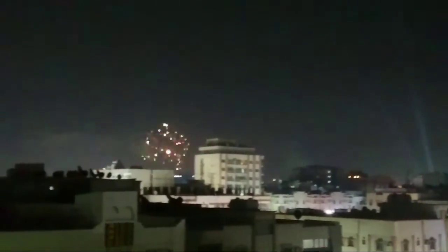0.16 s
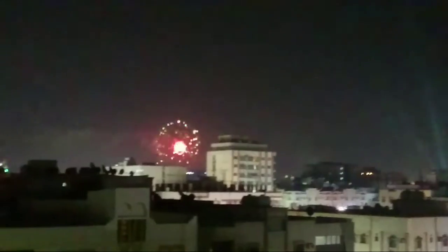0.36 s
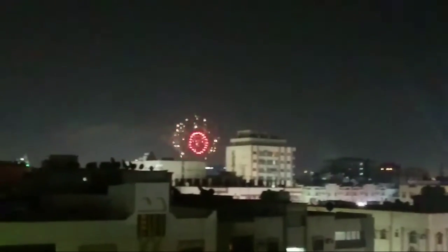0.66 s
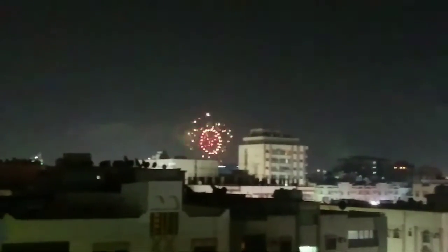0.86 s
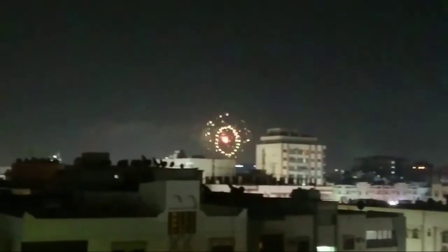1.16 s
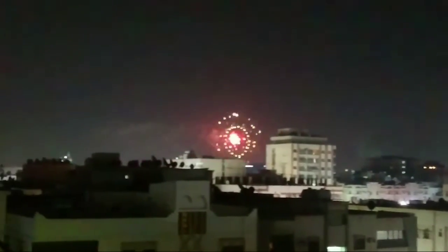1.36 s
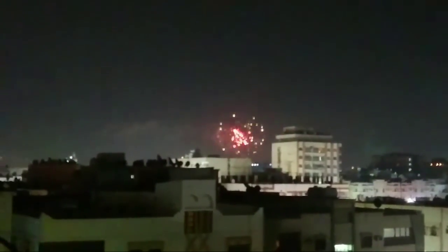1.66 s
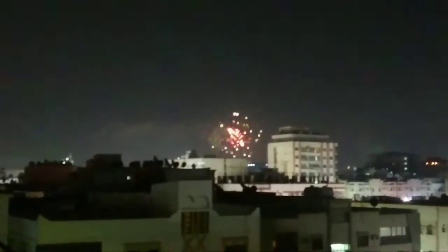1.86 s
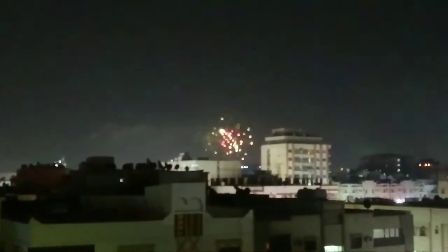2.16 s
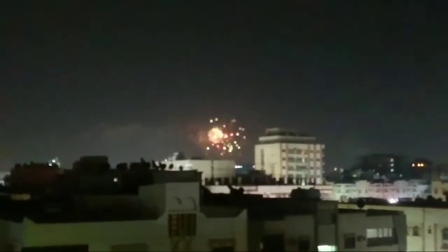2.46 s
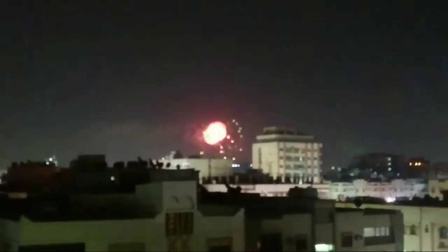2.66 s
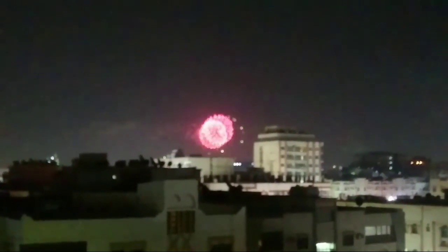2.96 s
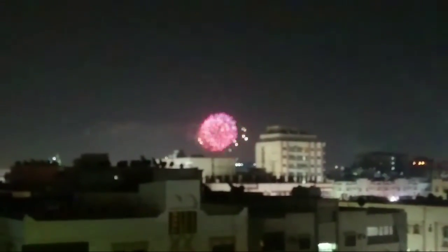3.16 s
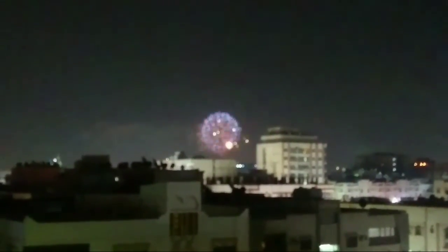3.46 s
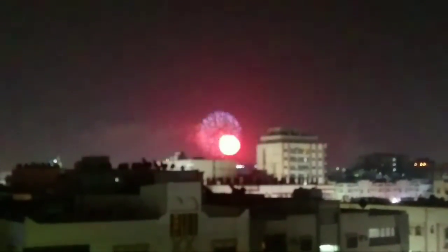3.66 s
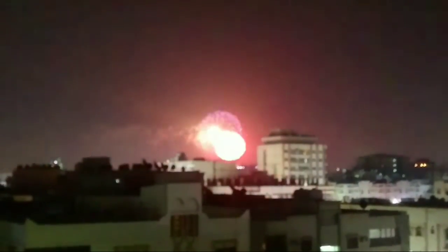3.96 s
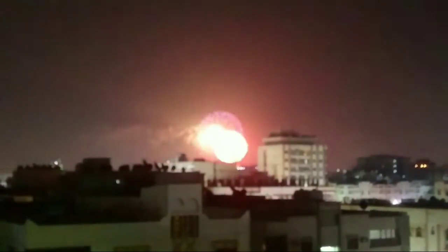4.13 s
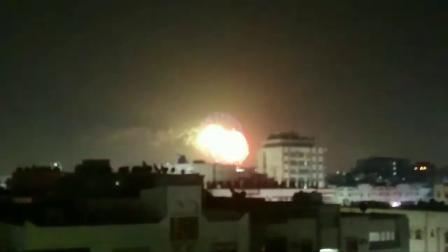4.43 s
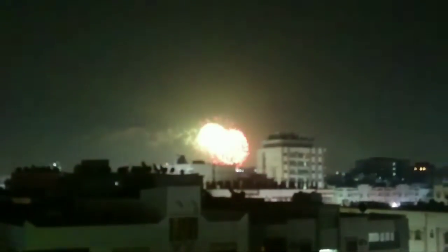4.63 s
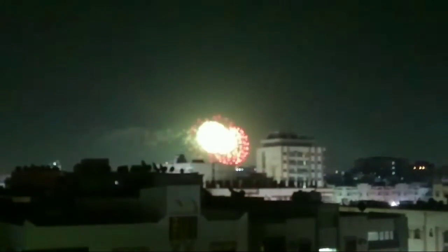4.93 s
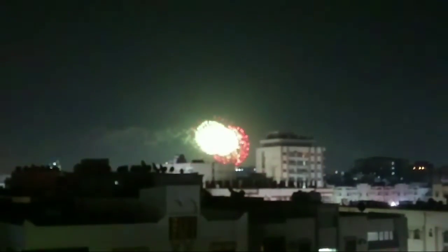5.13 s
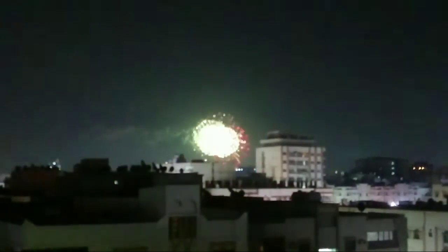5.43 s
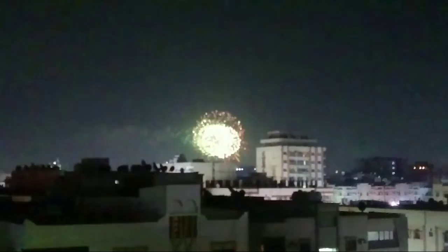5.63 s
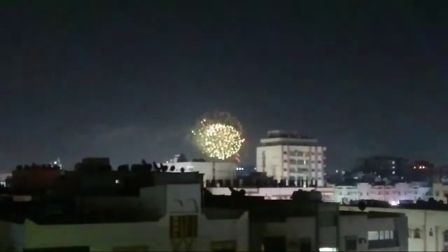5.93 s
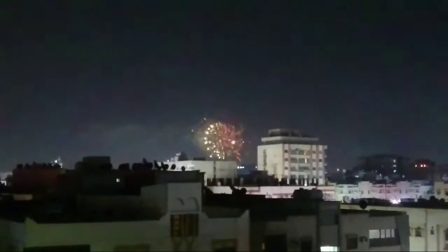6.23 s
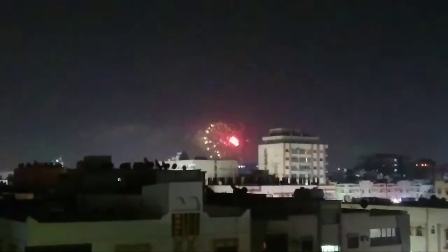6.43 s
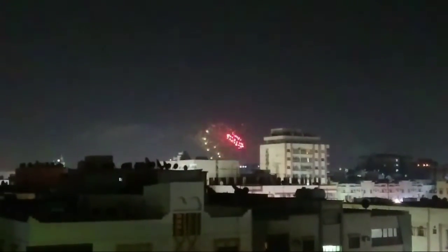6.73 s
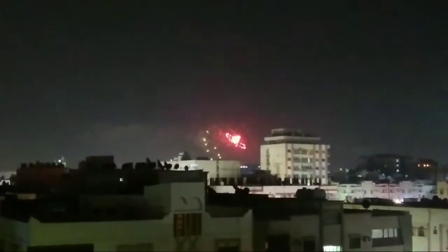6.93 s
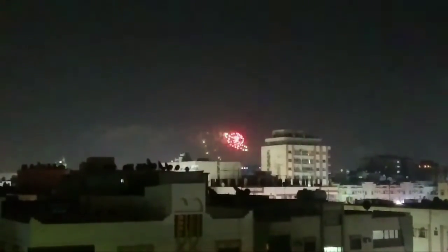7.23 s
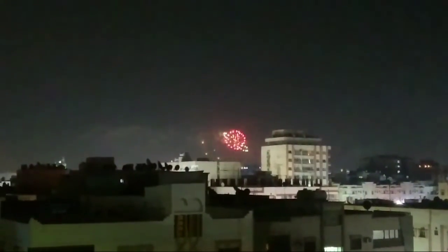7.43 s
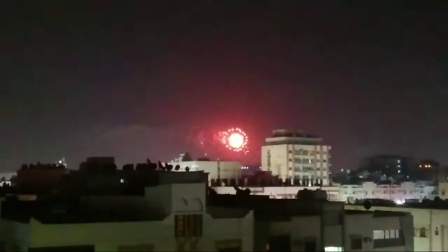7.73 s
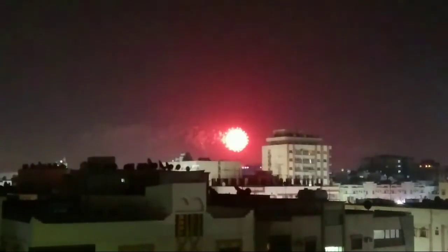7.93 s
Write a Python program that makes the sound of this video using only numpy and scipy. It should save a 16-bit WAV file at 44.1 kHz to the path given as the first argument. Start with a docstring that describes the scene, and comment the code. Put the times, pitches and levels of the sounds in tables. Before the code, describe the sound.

Distant aerial fireworks heard from a walled roof terrace at night. A rapid, uneven cluster of muffled cracks and deep booms fills the first two seconds, then the rumble fades. Two strong blasts follow near four seconds, then well-spaced single ones. Each claps back off house fronts and rolls over the town, above a quiet low wash of distant traffic.

```python
"""A walled roof terrace over a town at night, two microphones, distant fireworks.
First, and throughout, the steady wash of the town: shaped noise with a faint hum. Then each blast wave
arrives as a short crack of pressure jumps and filtered noise, and sets the air between the walls booming.
Nearby roofs crackle and a roll of countless weak echoes, made of decaying noise, spreads over the town.
Through the roll come the claps of house fronts, near then far: resonant knocks smeared by noise."""
import sys
import numpy as np
from scipy import signal
from scipy.io import wavfile
from scipy.ndimage import uniform_filter1d

SR = 44100
rng = np.random.default_rng(int(sys.argv[2]) if len(sys.argv) > 2 else 0)


def to_wav(s):
    """Save 16-bit WAV."""
    ch = np.atleast_2d(s).T  # columns
    pcm = np.round(np.clip(ch, -1, 1) * 32767)  # PCM
    wavfile.write(sys.argv[1], SR, pcm.astype(np.int16))


N = 356769

# Wash of the town: [f/Hz, level/(dB per Hz)]
WASH_SPECTRUM = [(30, -106.5), (55, -71), (100, -71.5), (200, -77), (400, -78.5), (750, -85), (1050, -85),
                 (1200, -89.5), (2200, -95.5), (4000, -101), (6400, -103), (7600, -111), (11000, -117),
                 (14000, -123)]
# How alike the wash is at both microphones: [f/Hz, likeness from 0 to 1]
WASH_LIKENESS = [(100, 0.91), (500, 1), (1500, 0.22), (3000, 0.01), (6000, 0.023)]
# Wash at the left microphone over the right: [f/Hz, level/dB]
WASH_LEFT = [(60, -8), (200, -3.5), (400, -2.5), (2500, -3), (12000, -2.5)]
# Wavering of the wash: [f/Hz, standard deviation/dB]
WASH_SWELL = [(60, 2.2), (300, 1.3), (1000, 0.4), (4000, 0.2)]
# Faint wavering hum from the town: [f/Hz, width/Hz, level/dB]
TOWN_HUM = (232, 4, -55.5)

# Shells: [t/s, blast level/dB, rise/ms, boom/dB over the blast, upper boom/dB over the boom,
#  brightness/dB, snap/dB over the blast, second crack/dB over the blast, near clap level/dB,
#  far clap level/dB, far clap edge/dB, last knock/dB, extra way to the far fronts/ms]
SHELLS = [(0.409, -16, 1, -2, 4.5, 0, -62, -16, -47, -62, 1, 1, -2),
          (0.4171, -10, 0.35, 1.5, -2, -0.5, -47, -7, -30.5, -20, -2, 1, 4),
          (.6500, -12.5, 0.18, 9, -7, 11, -46, -5, -30.5, -42, 8, 3, 4.5),
          (0.7200, -9.5, 0.41, 6.5, -7, 1, -65, -0.5, -32, -22, -6, 1, 2.5),
          (0.7786, -34, 0.26, -8.5, 1, 7, -45, -15, -73, -62, 0, -2, 0),
          (0.7864, -16, 0.19, 4.5, 6, 7.5, -38, -3, -40, -27, 2, 1, 3.5),
          (1.0588, -13, 0.36, 8, -6.5, 3.5, -45, 1, -21.5, -29, -12, -5, 1.3),
          (1.16, -7.5, 0.26, -0.5, 6, 9, -52, -14, -32, -21.5, -5.5, 5.5, -2),
          (1.7274, -27, 0.28, 5.5, 7, 7, -52, 7, -48, -29, -2, -9, 3),
          (1.7560, -17.5, 0.22, 2, 5, -6, -45, -6, -49, -39, -2, 3, 0.5),
          (1.814, -12, 0.38, -2, 4.5, -30, -53, -25, -53, -32, -7, -6, 7),
          (1.846, -32.5, 0.35, 8, 8, -17, -60, -15, -59, -48, 0, 2, 16),
          (2.0850, -19, 0.37, 6, 0, 4.5, -48, -8, -42, -27.5, -8, 2, 5.5),
          (3.6785, -7.5, 0.23, 3.5, -2, 11, -38, -2, -28, -18.5, 0, 8, 1.7),
          (3.868, -28.5, 0.22, -13, 0, -4, -43, -11, -60, -50, 0, 2, -1),
          (4.025, -6.5, 0.41, -1, 3, -1.5, -41, -2.5, -28, -31, 5, 7, -2),
          (5.1158, -8.5, 0.23, 2.5, 1, 3.5, -49, -8, -33.5, -20, -5, 0.5, 0.44),
          (6.256, -54, 0.6, -2, 6.5, -10, -70, -16, -80, -77, 3, 0, 0),
          (6.345, -36, 0.93, -8.5, 11, -10, -70, -15, -80, -74, 0, 0, 3),
          (7.2572, -5.5, 0.28, -2, 2, 0, -37, -6, -35.5, -23.5, -7, 0, 0.5),
          (7.9830, -5.5, 0.24, -2, 2, 3, -42, -3, -41, -22, -2, 0, 4)]
# Pressure waves, direct and off near walls: [delay/ms, level/dB over the blast, pressure phase/ms, push + or pull -]
NEAR_WAVES = [(0.332, 13.5, 0.47, "+"), (0.97, 12, 0.28, "+"), (5.333, 6, 0.41, "+"),
              (32.16, -0.5, 2.5, "+"), (41.3, -8, 2, "-"), (49.24, 0, 1.73, "+"), (54.85, -4, 1, "-")]
POLARITY = {"+": 1, "-": -1}  # [push or pull: factor]
# Thin snap on the wave front: [f/Hz, width/Hz]
SNAP_BAND = (6000, 3500)
# Rattle of the splintered front: [f/Hz, width/Hz, level/dB, t60/s]
FRONT_RATTLE = [(430, 700, -10.5, 0.027), (940, 500, -9, 0.043), (2290, 1700, -23, 0.011)]
# Rattle off the nearest wall: [f/Hz, width/Hz, level/dB, t60/s]
WALL_RATTLE = [(500, 1100, -10.5, 0.019), (1102, 990, -16.5, 0.019), (2740, 1800, -30, 0.0062)]
# Corners of the terrace that ring briefly: [f/Hz, width/Hz, level/dB]
CORNERS = [(568, 65, -26), (918, 200, -19.5)]
# Standing waves of the terrace air: [f/Hz, level/dB, t60/s, push + or pull - at the microphone]
STANDING_WAVES = [(59.9, -4, 0.77, "+"), (65, 2, 0.16, "+"), (72.4, -16, 1.2, "+"),
                  (75.77, -0.5, 0.78, "-"), (81.9, -6, 0.29, "-"), (90.7, -12, 1.13, "+"),
                  (98.3, -13.5, 0.45, "-"), (112.6, 1.1, 0.17, "-"), (143, -32.5, 0.44, "+"),
                  (151, -24, 0.91, "-"), (189.4, -4, 0.064, "-"), (234, -19, 0.33, "-"),
                  (322, -23.5, 0.46, "-"), (392.8, -18.5, 0.11, "+")]
# Crackle off nearby roofs: [f/Hz, width/Hz, level/dB, t60/s, grains per s, spread/dB]
ROOF_CRACKLE = (995, 1202, -38, 0.15, 904, 5.5)
# Roll over the roofs: [f/Hz, relative level/dB, t60/s]
ROLL_BANDS = [(37.6, -40, 2.8), (60, -14, 4.4), (110, -15.5, 2.55), (150, -17, 2.37), (208, -21.5, 2.37),
              (481, -30, 3.37), (870, -42.5, 2.27), (2295, -59, 0.86)]
# Time the roll takes to gather: [f/Hz, rise/s]
ROLL_RISE = [(60, 0.2), (200, 0.015), (600, 0.009)]
# Open ground, then the far blocks answer in the roll: [t/s, level/dB]
OPEN_GROUND = [(0, 4), (0.12, -0.5), (0.2, -7), (0.243, -3), (0.262, -2), (0.34, 4), (0.45, -1)]
# House fronts, the first near: [delay/s, knock level/dB, knock f/Hz, knock width/Hz,
#  edge level/dB, edge f/Hz, smear t60/s, left microphone leads by/ms]
HOUSE_FRONTS = [(.0755, -0.5, 704, 1095, -5, 1450, 0.042, .1),
                (0.2533, 0.5, 531, 606, -14, 1500, 0.049, 0.33),
                (.3205, 0.5, 467, 500, -15.5, 1600, .035, .3),
                (0.3565, -7.5, 540, 600, -10.5, 1600, 0.046, 0.39)]

BOUNCE_MS = 5.6  # the nearest wall repeats each crack
DULL_DB, DULL_PER_BRIGHT = -1.5, -0.16  # the brighter a shell, the less dull rattle
UPPER_HZ = 95  # higher standing waves depend on where the shell bursts
ROLL_DB, ROLL_PER_BOOM = -4, 0.7  # the roll grows more slowly than the boom
LUMP_DB = 3.5  # the roll comes in surges
LEDGES = 0.072  # smear of a house front, relative to its knock
EDGE_WIDTH_HZ, EDGE_SPREAD_S, SPLINTERS = 2300, 0.0022, 0.45  # the edge arrives as a few splinters
AIR_HZ = 3130  # the air has taken the treble above
BAND_LIMIT_HZ = 14900


def gain_of(db):
    """Amplitude factor of a level in dB."""
    return 10 ** (np.asarray(db) / 20)


def read(points, hz):
    """Read a curve between its points, on a logarithmic frequency scale."""
    f, value = np.transpose(points)
    return np.interp(np.log(hz + 1), np.log(f + 1), value)


def add(mix, s, sound):
    """Lay a sound into the mix at s seconds, cut at the end."""
    part = mix[..., round(s * SR):][..., :sound.shape[-1]]
    part += sound[..., :part.shape[-1]]


def pair(x, left_db, lead_ms=0.):
    """Two microphones: the left one weaker, the right one later."""
    lag = max(round(lead_ms * SR / 1000), 0)
    later = np.r_[np.zeros(lag), x[:len(x) - lag]]
    return np.array([x, later]) * gain_of([[left_db / 2], [-left_db / 2]])


def resonate(x, hz, width):
    """A fixed resonance of gain 1: shift the band to 0 Hz, smooth, shift back."""
    turn = np.exp(2j * np.pi * hz * np.arange(x.shape[-1]) / SR)
    r = np.exp(-np.pi * width / SR)
    return 2 * (turn * signal.lfilter([1 - r], [1, -r], x / turn)).real


def twice(x, hz, width):
    """A resonance passed twice: steeper flanks."""
    return resonate(resonate(x, hz, width), hz, width)


def steep(x, hz, width):
    """A resonance passed twice, scaled to peak 1."""
    y = twice(x, hz, width)
    return y / abs(y).max()


def town():
    """Traffic and machines far below: random spectra with drifting patches, left microphone first."""
    frames, hz = N // 512 + 5, np.fft.rfftfreq(2048, 1 / SR)
    a, b, c, d, patches = rng.standard_normal((frames, 1025, 5)).T
    patches = uniform_filter1d(uniform_filter1d(patches, 16, 0), 8, 1)
    swell = uniform_filter1d(uniform_filter1d(rng.standard_normal(frames), size=5), size=5)
    same = np.clip(read(WASH_LIKENESS, hz), 0, 1)[:, None]
    sooner = np.exp(2j * np.pi * hz * 0.00035)[:, None]  # 0.35 ms
    right = a + 1j * b
    left = same * sooner * right + np.sqrt(1 - same ** 2) * (c + 1j * d)
    level_db = read(WASH_SPECTRUM, hz)[:, None] + 0.33 * patches / patches.std()
    level_db = level_db + np.outer(read(WASH_SWELL, hz), swell / swell.std())
    z = np.array([left, right]) * gain_of(level_db)
    z *= gain_of(np.outer([.5, -.5], read(WASH_LEFT, hz)))[:, :, None]
    wash = np.sqrt(SR / 2048 * 3) * signal.istft(z, nperseg=2048, noverlap=1536)[1][:, :N]
    return wash + town_hum()


def town_hum():
    """A steady tone plus narrow noise around it, which makes it waver."""
    hz, width, db = TOWN_HUM
    noise = twice(rng.standard_normal(N), hz, width)
    tone = np.sin(2 * np.pi * hz * np.arange(N) / SR)
    return pair(gain_of(db) * (0.57 * noise / noise.std() + tone), -13.5)


def blast(phase_ms, rise_ms):
    """A pressure jump that sinks into suction, its front rounded by the long way through the air."""
    ms = np.arange(1500) * 1000 / SR
    front = np.exp(-.5 * ((ms[:120] - .75) / rise_ms) ** 2)
    jump = (1 - ms / phase_ms) * np.exp(-ms / phase_ms)
    return np.convolve(jump, front / front.sum())[:1500]


def near_waves(s, db, rise_ms):
    """The blast wave arrives directly and again off near walls, as push or pull."""
    for ms, near_db, phase_ms, sign in NEAR_WAVES:
        wave = blast(phase_ms, rise_ms * (1 + ms / 40))  # later bounces are rounder
        yield s + ms / 1000, pair(POLARITY[sign] * gain_of(db + near_db) * wave, -4.0)


def snaps(s, snap_db, second_db, hiss):
    """A thin click on the wave front, then a hissing one off the nearest wall."""
    t = np.arange(len(hiss)) / SR
    yield s + 0.00065, pair(gain_of(snap_db) * steep(1. * (t == 0), *SNAP_BAND), -2.0)
    bounce = steep(hiss * np.exp(-t / .0015), *SNAP_BAND)
    yield s + BOUNCE_MS / 1000, pair(gain_of(snap_db + second_db - 1.5) * bounce, -2.5)


def rattles(s, db, bright_db, second_db, hiss):
    """Roofs along the way splinter the front into a short rattle of noise; the nearest wall repeats it."""
    t = np.arange(hiss.shape[1]) / SR
    dull_db = DULL_DB + DULL_PER_BRIGHT * bright_db
    onset = np.minimum(t / 0.00012, 1) * gain_of([[-.8], [.8]])
    hard_crack = 4.7 * (t == t[8])
    chips = (hiss[:2] + 0.16 * hiss[2]) * onset + hard_crack  # hiss[2] is common to both sides
    again = (hiss[3:5] + 1.4 * hiss[2]) * onset + hard_crack
    for hz, width, band_db, t60 in FRONT_RATTLE:
        share_db = dull_db if hz < 700 else bright_db
        fading = chips * gain_of(db + share_db + band_db - 60 * t / t60)
        yield s + 0.00087, twice(fading, hz, width)
    for hz, width, band_db, t60 in WALL_RATTLE:
        fading = again * gain_of(db + second_db + band_db - 60 * t / t60)
        yield s + BOUNCE_MS / 1000, twice(fading, hz, width)


def corners(s, level_db):
    """Air in the corners of the terrace rings briefly when the front strikes it."""
    impulse = 1. * (np.arange(3000) == 0)
    for hz, width, corner_db in CORNERS:
        yield s + 0.0011, pair(gain_of(level_db + corner_db) * steep(impulse, hz, width), -1.2, 0.18)


def terrace(push):
    """The push rings the same standing waves, the low and the upper ones by their own amounts."""
    t, ring = np.arange(SR) / SR, np.zeros((2, SR))
    for hz, db, t60, sign in STANDING_WAVES:
        size = POLARITY[sign] * gain_of(db - 60 * t / t60) * 2 * np.pi * hz / SR
        ring[int(hz > UPPER_HZ)] += size * np.sin(2 * np.pi * hz * t)
    return pair(signal.oaconvolve(push, ring, axes=1)[:, :N].sum(0), -5.0)


def roofs(far):
    """Nearby roofs and chimneys throw back scattered little cracks that soon die out."""
    hz, width, db, t60, per_s, spread_db = ROOF_CRACKLE
    t = np.arange(SR // 2) / SR
    draw, size, sign = rng.random((3, 2, len(t)))
    grains = (draw < per_s / SR) * gain_of(-spread_db * np.log(size + 1e-4)) * np.sign(sign - .5)
    both = grains + 0.5 * grains[::-1]  # each side also hears the other's grains
    tail = resonate(twice(both, hz, width), hz, width)
    tail *= gain_of(db - 60 * t / t60) * np.minimum(t / 0.0051, 1) / tail.std()
    return signal.oaconvolve(far[None], tail, axes=1)[:, :N]


def roll(far):
    """Weak echoes: bands near 60 and 480 Hz last longest, treble dies soonest; the bass is more alike on both sides."""
    hz, t, z = signal.stft(rng.standard_normal((2, 2 * SR)), SR, nperseg=1024)
    f, db, t60 = np.transpose(ROLL_BANDS)
    same = np.clip(1.05 - hz / 2500, 0, .97)[:, None]
    z[0] = same * z[1] + np.sqrt(1 - same ** 2) * z[0]
    slope_db = -18 * np.log2(np.maximum(hz / f[-1], 1))  # above the last band
    band_db = (read(np.c_[f, db], hz) + slope_db)[:, None]
    z *= gain_of(band_db - 60 * t / read(np.c_[f, t60], hz)[:, None])
    rise_s = np.clip(read(ROLL_RISE, hz), .001, 1)[:, None]
    z *= 1 - np.exp(-(t + 0.0063) / rise_s)  # the bass gathers slowly
    z *= gain_of(np.interp(t, *np.transpose(OPEN_GROUND)))
    lumps = rng.standard_normal(z.shape[1:])
    lumps = uniform_filter1d(uniform_filter1d(lumps, size=7, axis=0), size=3, axis=1)
    z *= gain_of(LUMP_DB * lumps / lumps.std())
    tail = signal.istft(z, SR, nperseg=1024)[1] * gain_of([[-2], [2]])
    tail *= np.minimum(np.arange(tail.shape[1]) / SR / 0.0094, 1)
    return signal.oaconvolve(far[None], tail, axes=1)[:, :N] * gain_of(14.5)


def fronts(s, slap_db, far_db, far_edge_db, last_db, extra_ms, ledges):
    """Each house front returns a knock with a thin edge, smeared by its ledges and windows."""
    t = np.arange(ledges.shape[1]) / SR
    for k, (late, knock_db, hz, width, edge_db, edge_hz, t60, lead_ms) in enumerate(HOUSE_FRONTS):
        is_far = k > 0
        smear = np.r_[1, LEDGES * ledges[k, 1:]] * gain_of(-60 * t / t60)
        smear[round(BOUNCE_MS * SR / 1000)] += gain_of(-13.5)
        splinters = smear + SPLINTERS * ledges[k] * np.exp(-t / EDGE_SPREAD_S)
        if k == len(HOUSE_FRONTS) - 1:
            knock_db = knock_db + last_db
        knock = steep(resonate(smear, hz, width), hz, width)
        edge = steep(resonate(splinters, edge_hz, EDGE_WIDTH_HZ), edge_hz, EDGE_WIDTH_HZ)
        clap = gain_of(knock_db) * knock - gain_of(edge_db + is_far * far_edge_db) * edge
        if k == 1:
            clap *= gain_of(-2.6 * max(extra_ms, 0))  # shells off to the side light this front poorly
        level_db = far_db if is_far else slap_db
        yield s + late + is_far * extra_ms / 1000, pair(gain_of(level_db) * clap, -2.5, lead_ms)


def bursts():
    """Cracks and claps of all shells, and the trains that drive the terrace, the roofs and the roll."""
    direct, push, far = np.zeros((3, 2, N))
    noise = rng.standard_normal((len(SHELLS), 5 + len(HOUSE_FRONTS), 3000))
    for row, hiss in zip(SHELLS, noise):
        s, db, rise_ms, boom_db, upper_db, bright_db, snap_db, second_db, *echoes = row
        sounds = [*near_waves(s, db, rise_ms), *snaps(s, db + snap_db, second_db, hiss[3]),
                  *rattles(s, db, bright_db, second_db, hiss[:5]), *corners(s, db + bright_db),
                  *fronts(s, *echoes, hiss[5:])]
        for start_s, sound in sounds:
            add(direct, start_s, sound)
        low_db = db + boom_db
        shove = gain_of([[low_db], [low_db + upper_db]]) * blast(phase_ms=1.24, rise_ms=0.23)
        add(push, s + 0.0019, shove)
        roll_db = ROLL_DB + ROLL_PER_BOOM * low_db + 0.2 * upper_db
        add(far, s, gain_of([[roll_db], [db + 0.29 * bright_db]]))  # one impulse each: roll, roofs
    return direct, push, far


def scene():
    """The fireworks, dulled by the air, over the town."""
    direct, push, far = bursts()
    rolling = roll(far[0])
    booming = terrace(push + gain_of(-18) * rolling.mean(0))  # the late echoes keep the terrace humming
    fireworks = direct + booming + rolling + roofs(far[1])
    air = signal.butter(3, AIR_HZ, fs=SR, output="sos")
    return signal.sosfilt(air, fireworks) + town()


def record(dry):
    """The microphones lose the deepest bass; then the band limit."""
    thin = signal.sosfilt(signal.butter(3, 50, "high", fs=SR, output="sos"), dry)
    thin = signal.sosfilt(signal.butter(2, 34, "high", fs=SR, output="sos"), thin)
    band = signal.firwin(511, BAND_LIMIT_HZ, window=("kaiser", 9), fs=SR)
    return signal.oaconvolve(thin, band[None], "same")


dry = scene()
out = record(dry)
to_wav(out)
```